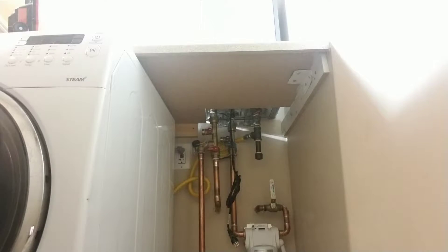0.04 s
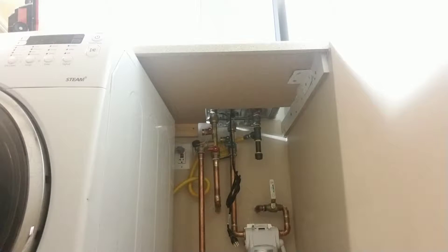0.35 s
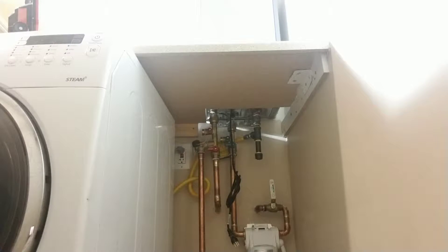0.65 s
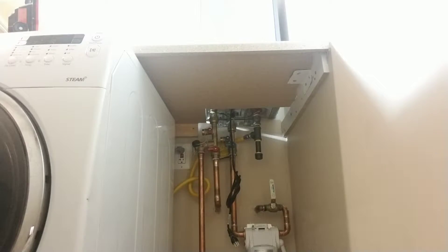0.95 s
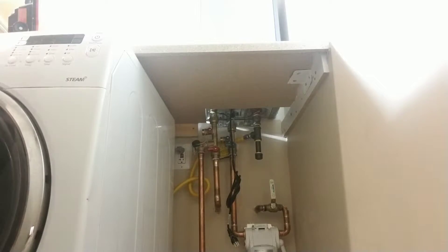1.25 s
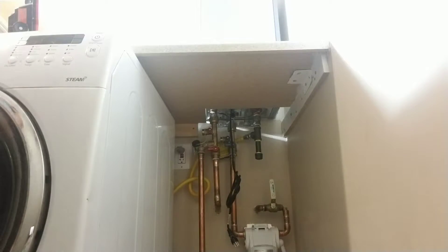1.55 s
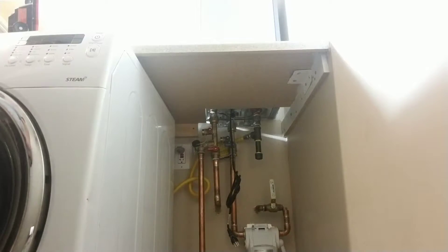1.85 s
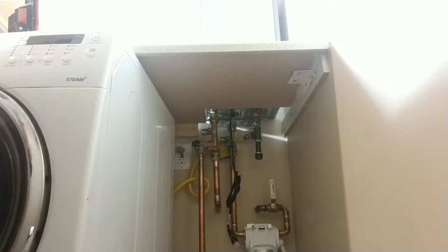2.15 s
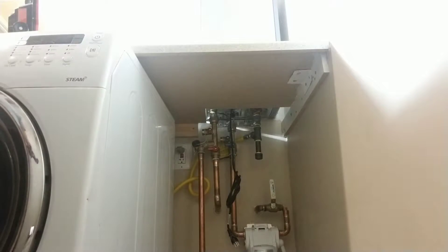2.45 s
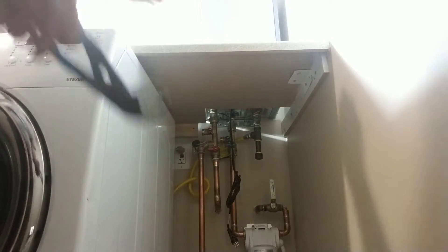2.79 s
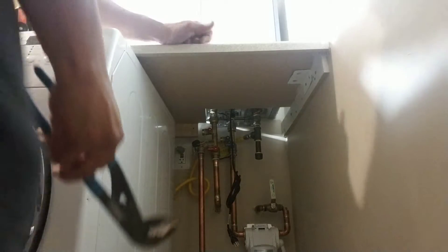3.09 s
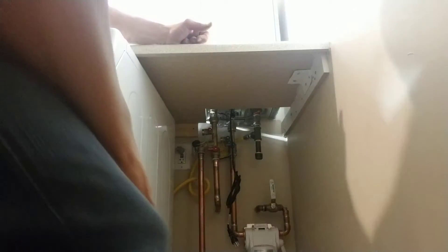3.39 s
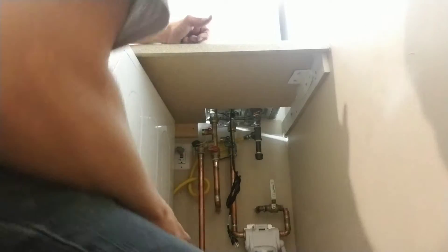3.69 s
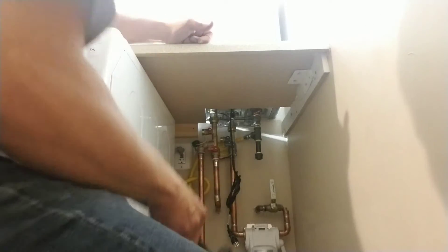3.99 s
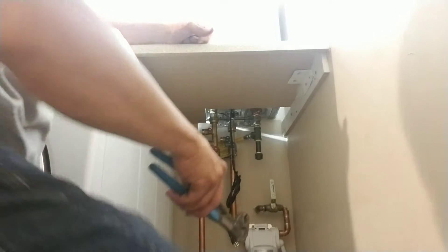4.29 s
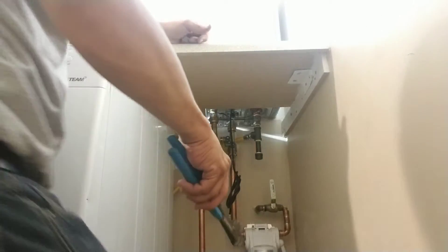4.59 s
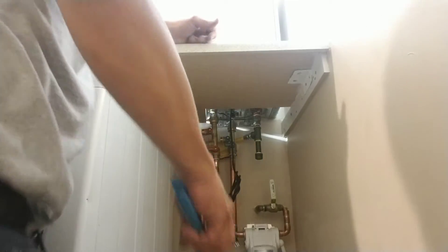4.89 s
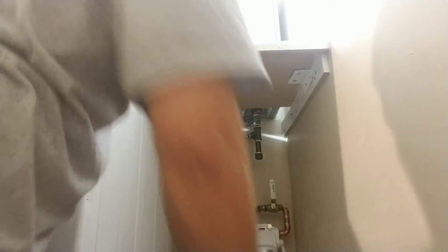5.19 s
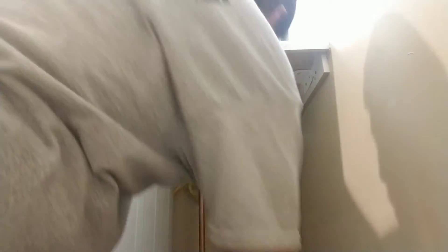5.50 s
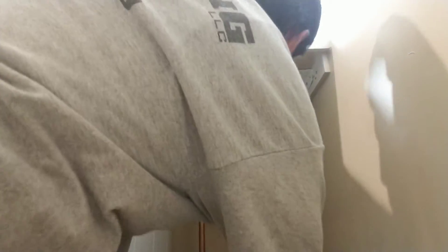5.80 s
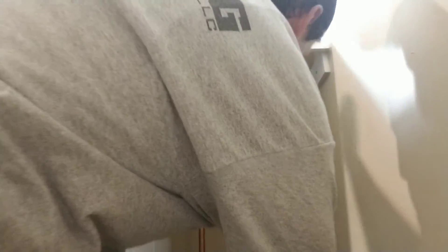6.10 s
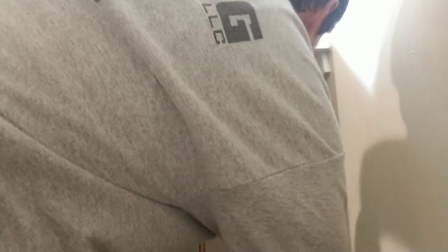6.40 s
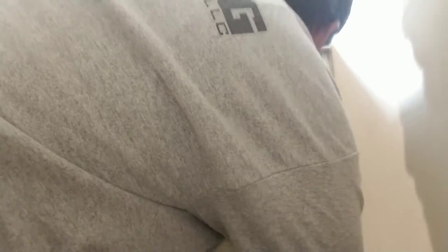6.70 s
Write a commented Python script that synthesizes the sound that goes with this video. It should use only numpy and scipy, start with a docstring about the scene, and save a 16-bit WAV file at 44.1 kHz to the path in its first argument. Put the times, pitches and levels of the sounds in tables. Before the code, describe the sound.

Clacks and shuffling steps, a bump on a washing machine, rustling clothes and tool knocks, then a sputtering hiss swells.

```python
"""Two clacks come first, as things are put down in a small laundry room. Someone steps and shuffles closer,
bumps the washer's sheet-metal side and kneels with rustling clothes. A tool knocks in the cabinet under
the water heater, and a broad hiss sputters and swells at the end. Each knock is a set of fading tones
plus a burst of noise. It is all heard from a phone set low between the washer and a wall."""
import sys
import numpy as np
from scipy import signal
from scipy.fft import rfft, irfft, next_fast_len
from scipy.io import wavfile
from scipy.ndimage import uniform_filter1d

SR = 44100
rng = np.random.default_rng(int(sys.argv[2]) if len(sys.argv) > 2 else 0)


def persist_wave(psi):
    """Save psi, clipped to +-1, as 16-bit WAV."""
    counts = np.round(np.clip(psi, -1, 1) * 32767).astype(np.int16)
    wavfile.write(sys.argv[1], SR, np.atleast_2d(counts).T)


N = 302085
T = np.arange(N) / SR
RING_T = T[:int(.45 * SR)]  # the seconds that one short sound has to ring out


# each knock of the tool: start_s, thump_db, body_db, clack_db, click_db, tick_db, decay_s
TOOL_HITS = [(4.519,-44,-27.5,-53,-72,-59,0.23), (4.888,-54,-37.5,-65,-67,-72,0.16),
             (5.029,-42,-26.5,-40,-44,-61,0.17), (5.576,-37,-20,-21,-29,-37,0.28),
             (5.769,-57,-27.5,-40,-60,-62,0.26), (5.839,-53.5,-28.5,-47,-68,-72,0.14),
             (5.871,-60,-18.5,-23.5,-39.5,-49,0.12)]
# the tones the cabinet rings with: pitch_hz, level_db, decay_s
CABINET_TONES = [(200, 0, 0.26), (239, -4, 0.41), (305, 1.5, 0.14), (341, 3.5, 0.26), (457.5, 2, 0.15),
                 (668, 4, 0.1), (943, 4.5, 0.4), (1034, 10.5, 0.084), (1120, -10, 0.29), (1247, 6.5, 0.046),
                 (1504, 0.5, 0.077), (1670, 8, 0.05), (2620, -3.5, 0.084)]
# the noise of the tool touching it: pitch_hz, level_db
TOOL_SPECTRUM = [(170, -9), (260, -6), (550, -3.5), (750, -4), (1000, -5.5), (1400, -9), (2000, -16),
                 (2900, -24), (7500, -16), (9500, -16), (14000, -24)]

def tool_knocks():
    """A tool strikes the cabinet under the heater and sets it ringing."""
    return blows(TOOL_HITS, CABINET_TONES, TOOL_SPECTRUM, noise_db=6.5, hold=0.99, rise_s=0.00023, gain_db=3)


# each clink of the pliers: start_s, level_db
PLIER_HITS = [(2.826, -33), (5.578, -44), (5.848, -24.5)]
# the tones of their jaws: pitch_hz, level_db, decay_s
PLIER_TONES = [(3550, -8, .07), (4180, -2.5, 0.082), (4420, -8, .07), (5450, -10, .06), (6340, -7, .06),
               (7800, -5, .06)]

def plier_clinks(scrape_db=-7, scrape_s=0.096):
    """The steel jaws of the pliers touch, scrape and ring briefly."""
    out = np.zeros((2, N))
    for start_s, db in PLIER_HITS:
        scrape = colour(noise(len(RING_T)), [(3300, -2.0), (8000, -13)]) * fade(scrape_s)
        add(out, start_s, undb(db) * (ring(PLIER_TONES) + undb(scrape_db) * scrape))
    return out


# how the steady flow builds: time_s, level_db
HISS_FLOW = [(5.85, -35), (6.11, -39), (6.22, -34.5), (6.45, -33), (6.69, -28.5), (6.85, -30.5)]
# the bright hiss and the lower rush under it: pitch_hz, level_db
HISS_SPECTRUM = [(2000, -5.5), (3500, 0.5), (5000, 1), (6300, 1.5), (7000, -0.5), (7900, 0.5), (9200, -5),
                 (11800, -1), (15500, -4)]
RUSH_SPECTRUM = [(100, 3), (250, -6.5), (320, 8), (420, -2.5), (700, 1.5), (1200, 2.5), (1900, 2),
                 (2400, 3), (3500, 0.5), (6000, -5)]

def hiss(start_s=5.842, rise_s=0.017, rush_db=-31.5, flutter_db=1.0, spatter_db=-10.5):
    """A fine, spray-like hiss opens suddenly and spatters; a lower rush grows under it."""
    flow_db = np.interp(T, *np.transpose(HISS_FLOW))
    opened = np.clip((T - start_s) / rise_s, 0, 1)
    spray_level = np.hypot(opened * undb(flow_db), spurts(start_s, rise_s))
    rush_level = opened * undb(rush_db + flow_db - flow_db.max())
    flutter = undb(flutter_db * wander(35))
    spray = colour(noise(N) * flutter, HISS_SPECTRUM) + undb(spatter_db) * spatter(start_s)
    return spray_level * spray + rush_level * colour(noise(N) * flutter, RUSH_SPECTRUM)


def spurts(start_s, rise_s, every_s=0.0947, fall_s=0.029, first_db=-31.5, sag_db_per_s=-10, count=6):
    """The loudness of the sputter: each spurt opens quickly and dies away, weaker than the last."""
    out = np.zeros(N)
    for delay in every_s * np.arange(count):
        since = T - start_s - delay
        shape = np.clip(since / rise_s, 0, 1) * np.exp(-np.maximum(since - rise_s, 0) / fall_s)
        out += undb(first_db + sag_db_per_s * delay) * shape
    return out


def spatter(start_s, pings_per_s=600, spread_db=4.0, cycles=70):
    """Tiny pings come at chance times and pitches, a few of them standing out."""
    out, t = np.zeros((2, N)), T[:1024]
    span_s = T[-1] - start_s
    for when, pitch, strength, side in rng.random((int(pings_per_s * span_s), 4)):
        hz = 1900 * 4 ** pitch
        level = undb(-spread_db * np.log(max(strength, .04)))
        ping = level * np.sin(2 * np.pi * hz * t) * np.exp(-np.pi * hz * t / cycles)
        add(out, start_s + when * span_s, np.sqrt([[side], [1 - side]]) * ping)
    return out / rms(out[:, int(start_s * SR):])


# the bump on the washer: start_s, thump_db, body_db, clack_db, click_db, tick_db, decay_s
WASHER_HITS = [(2.987, -21.5, -22.5, -19.5, -34.5, -49, 0.17)]
# the tones of its side: pitch_hz, level_db, decay_s
WASHER_TONES = [(67, -17, .14), (123, -4, .22), (156, -6.5, 0.16), (281.8, -5.5, 0.45), (326, -14, 0.66),
                (696, -1, 0.15), (957, -7, 0.19), (1300, 6, 0.1), (1364, 3, 0.051), (1595, 0, 0.13),
                (1713, 7, 0.088)]
# the noise of the bump: pitch_hz, level_db
BUMP_SPECTRUM = [(45, 3.5), (120, -2.5), (500, -11.5), (750, -3), (1100, -13), (1400, -1), (1800, -7.5),
                 (2200, -12.5), (5000, -23), (14000, -52)]

def washer_bump():
    """Someone bumps the washer and its sheet-metal side rings."""
    return blows(WASHER_HITS, WASHER_TONES, BUMP_SPECTRUM, noise_db=6.5, hold=5.2, rise_s=0.0058)


# each soft thud of a body: start_s, pitch_hz, level_db, decay_s
BODY_THUDS = [(2.972, 65.5, -16, 0.17), (3.258, 121, -12, 0.08), (3.644, 77.5, -29, 0.046),
              (4.136, 131, -15, 0.067), (5.239, 103, -33, 0.039)]

def thuds(rise_s=0.0037):
    """A soft push makes a large panel swing for a few cycles."""
    out = np.zeros((2, N))
    for start_s, hz, db, decay_s in BODY_THUDS:
        swing = np.sin(2 * np.pi * hz * RING_T) * fade(decay_s) * rise(rise_s) ** 2
        add(out, start_s, undb(db) * swing[None] / np.abs(swing).max())
    return out


# the path of the washer's groan: time_s, pitch_hz, level_db
GROAN_PATH = [(3.03, 277.4, -60), (3.08, 295.8, -27.5), (3.141, 334, -30), (3.19, 353.6, -36),
              (3.24, 334.6, -53), (3.28, 338, -29), (3.35, 304, -54)]

def washer_groan(wobble=0.039, rough_db=3):
    """The leaned-on panel sticks and slips: an unsteady tone that rises with the pressure."""
    times, hz, db = np.transpose(GROAN_PATH)
    pitch_hz = np.interp(T, times, hz) * (1 + wobble * wander(120))
    phase = 2 * np.pi * np.cumsum(pitch_hz) / SR
    tone = np.sin(phase + np.array([[0], [np.pi / 4]]))
    level = undb(np.interp(T, times, db) + rough_db * wander(70))
    return tone * level * (T > times[0]) * (T < times[-1])


# each thing put down: start_s, thump_db, body_db, clack_db, click_db, tick_db, decay_s
PUT_DOWN_HITS = [(.338,-34.5,-24,-37.5,-34,-42.5,0.22), (.791,-33.5,-24,-30,-31,-39.5,0.22)]
# the tones of the floor, under things and feet alike: pitch_hz, level_db, decay_s
FLOOR_TONES = [(86, -31, 0.11), (137.6, -1, 0.066), (195, 2, 0.068), (288.6, -4, 0.33), (348, -18.5, 0.049),
               (396, -4, 0.17), (664, -5, 0.095), (897, -12, 0.28), (1513, -15.5, 0.27),
               (4380, -24.5, 0.22)]
# the noise of a thing landing: pitch_hz, level_db
LANDING_SPECTRUM = [(53, -37), (90, 5), (171, -5), (286, -9), (605, -17), (908, -15), (1010, -16.5),
                    (1620, -23), (1920, -24.5), (3500, -31), (4150, -32.5), (4520, -25.5), (9170, -39),
                    (13800, -33), (15000, -42)]

def clacks():
    """Two things are put down, and the floor rings under each."""
    return blows(PUT_DOWN_HITS, FLOOR_TONES, LANDING_SPECTRUM, noise_db=2, hold=6.7, rise_s=0.0038)


# each step: start_s, thump_db, body_db, clack_db, click_db, tick_db, decay_s
STEP_HITS = [(1.833,-32.5,-31,-41.5,-48.5,-82,0.095), (2.463,-37.5,-32.5,-45,-47,-59,0.061),
             (2.555,-34,-25.5,-35.5,-41,-73,0.12), (3.748,-39.5,-35,-48.5,-49.5,-62,0.3),
             (4.691,-34,-25.5,-41.5,-54.5,-61,0.12), (4.922,-34.5,-34.5,-51,-71,-74,0.41),
             (6.209,-64,-37.5,-53,-48,-47,0.3)]
# the noise of a foot landing: pitch_hz, level_db
STEP_SPECTRUM = [(75, -3), (130, -3), (200, -5.5), (350, -5), (500, -10), (700, 0), (1000, -8.5),
                 (2500, -20), (5000, -24), (14000, -42)]

def footsteps():
    """A foot strikes the floor and stays there, cutting the ring short."""
    return blows(STEP_HITS, FLOOR_TONES, STEP_SPECTRUM, noise_db=1.5, hold=1.2, rise_s=0.00031, gain_db=1)


# small things being handled: start_s, knock_db, scrape_db, scrape_pitch_hz, decay_s
SCUFF_HITS = [(.223, -50, -49, 9900, 0.23), (.964, -42.5, -54, 4460, 0.11), (1.216, -36.5, -41, 3270, .18),
              (1.265, -44.5, -53, 3600, 0.23), (1.337, -39.5, -37.5, 2950, 0.25),
              (1.45, -37, -36.5, 1310, 0.28), (1.499, -33.5, -42.5, 5640, 0.22),
              (1.614, -56.5, -45.5, 3600, 0.21), (1.785, -48.5, -54, 1300, 0.31),
              (2.235, -44, -46, 3400, 0.18), (2.955, -37.5, -49, 800, 0.14), (3.233, -37, -54, 6000, 0.053),
              (3.361, -39, -43, 1600, 0.23), (3.56, -35.5, -34, 2300, .25)]
# the tones of those tools and parts: pitch_hz, level_db, decay_s
HANDLED_TONES = [(182.4, -6.5, 0.26), (288, -3.5, 0.3), (423, -8, 0.087), (1565, -11, 0.23),
                 (2870, -11, 0.25), (3210, -0.5, 0.14), (4110, -23, 0.25), (4500, -8, 0.23),
                 (5430, -10, 0.13)]
# the noise of their scraping: pitch_hz, level_db
SCRAPE_SPECTRUM = [(110, 5), (300, -2.5), (700, -5.5), (1600, -8), (2200, -5.5), (3000, -5), (3700, -8.5),
                   (4400, -8), (6500, -13), (9500, -20.5), (14000, -20)]

def scuffs():
    """A scuff is a dull knock plus a scrape; the harder the contact, the higher the scrape lies."""
    centres_hz = np.sqrt(np.multiply(BAND_EDGES[1:], BAND_EDGES[:-1]))
    knock_shape_db = np.array([-8.5, -0.5, -15, -34, -48])  # thump to tick
    hits = []
    for start_s, knock_db, scrape_db, hz, decay_s in SCUFF_HITS:
        knock = undb(knock_db + knock_shape_db)
        octaves_away = np.log2(centres_hz / hz)
        scrape = undb(scrape_db - 4 * octaves_away ** 2)
        bands_db = 20 * np.log10(np.hypot(knock, scrape))
        hits.append((start_s, *bands_db, decay_s))
    return blows(hits, HANDLED_TONES, SCRAPE_SPECTRUM, noise_db=9, hold=7.8, rise_s=0.00093, gain_db=1)


# each slide of metal on metal: middle_s, length_s, level_db
METAL_SLIDES = [(0.959, 0.072, -40.5), (1.3, 0.13, -49)]
# the tones of the sliding part: pitch_hz, level_db, decay_s
PART_TONES = [(2800, -1.5, 0.067), (3060, 2, .06), (3410, -2, .1), (3970, -8, .04), (4400, -3, .06)]

def slides(scrape_db=1):
    """Friction swells and fades; it scrapes and keeps the part ringing."""
    push = sum(undb(db) * swell(middle_s, length_s) for middle_s, length_s, db in METAL_SLIDES)
    ringing = resonate(push * noise(N), ring(PART_TONES))
    scrape = undb(scrape_db) * push * colour(noise(N), SCRAPE_SPECTRUM)
    return (ringing + scrape) / np.sqrt(2)


def squeak(start_s=1.449, start_hz=2650, fall_hz_per_s=14000, width_hz=260, level_db=-30.5):
    """One slip squeaks: a rough tone that drops in pitch as the slip slows down."""
    out = np.zeros((2, N))
    rough = signal.sosfilt(signal.butter(2, width_hz, fs=SR, output="sos"), noise(len(RING_T)))
    hz = np.maximum(start_hz - fall_hz_per_s * RING_T, start_hz / 2)
    tone = rough / rms(rough) * np.sin(2 * np.pi * np.cumsum(hz) / SR)
    add(out, start_s, undb(level_db) * tone * fade(decay_s=0.14) * rise(rise_s=.002))
    return out


# how briskly the person moves: time_s, level_db
BODY_EFFORT = [(0, -61.5), (.2, -68), (.72, -73), (.9, -62.5), (1.3, -51), (1.7, -59), (2.05, -55.5),
               (2.9, -53), (3.1, -46.5), (3.95, -50.5), (4.45, -46.5), (4.66, -57), (4.95, -51.5),
               (5.3, -61), (5.5, -50.5), (5.8, -61)]
# shifts of weight on the floor: middle_s, length_s, level_db
WEIGHT_SHIFTS = [(3.7, 0.14, -45), (3.89, 0.14, -43), (4.297, 0.32, -40), (4.964, 0.12, -39.5),
                 (5.117, 0.15, -37.5), (5.43, 0.19, -48), (6.085, 0.098, -40.5), (6.266, 0.075, -45),
                 (6.77, .18, -46)]
# strokes of cloth over cloth: middle_s, length_s, rub_db, swish_db
CLOTH_STROKES = [(0.017, 0.088, -66, -55.5), (1.357, 0.097, -43, -53), (2.455, 0.13, -41, -43),
                 (2.723, 0.093, -54, -53), (3.808, 0.097, -42.5, -46.5), (4.217, 0.21, -39, -47.5),
                 (4.32, 0.11, -43.5, -44.5), (4.495, 0.15, -62, -50), (4.785, 0.11, -47, -51),
                 (5.015, 0.044, -42, -50)]
# quick brushes of a sleeve: start_s, level_db, length_s
SLEEVE_BRUSHES = [(4.064, -41, 0.11), (5.397, -35.5, 0.12)]
# the low rumble, the rub of cloth and its high swish: pitch_hz, level_db
RUMBLE_SPECTRUM = [(35, -6.5), (70, -0.5), (140, 4), (200, 1), (310, 3), (420, -10), (620, -5.5),
                   (900, -13), (1400, -18)]
RUB_SPECTRUM = [(500, 15), (900, 1.5), (2500, 6.5), (4500, 4), (6500, -4.5), (9000, -51)]
SWISH_SPECTRUM = [(3000, -11.5), (5500, 1.5), (7600, 4.5), (9300, -2), (12000, 5), (15500, -0.5)]

def clothes(shuffle_db=7.5, swish_db=-3, catch_s=0.01, sag_db=-11, release_s=0.024):
    """Weight shifts with a low rumble while fabric catches and slips in fine grains."""
    effort = undb(np.interp(T, *np.transpose(BODY_EFFORT)))
    shuffle_power = (effort * undb(shuffle_db)) ** 2
    rub_power = effort ** 2
    swish_power = (effort * undb(swish_db)) ** 2
    for middle_s, length_s, db in WEIGHT_SHIFTS:
        shuffle_power += (undb(db) * swell(middle_s, length_s)) ** 2
    for middle_s, length_s, stroke_rub_db, stroke_swish_db in CLOTH_STROKES:
        stroke = swell(middle_s, length_s)
        rub_power += (undb(stroke_rub_db) * stroke) ** 2
        swish_power += (undb(stroke_swish_db) * stroke) ** 2
    for start_s, db, length_s in SLEEVE_BRUSHES:
        brush = np.interp(T - start_s, [0, catch_s, length_s, length_s + release_s], [0, 1, undb(sag_db), 0])
        swish_power += (undb(db) * brush) ** 2
    grain = undb(wander(440) + wander(30))
    shuffle = np.sqrt(shuffle_power) * colour(noise(N) * undb(wander(35)), RUMBLE_SPECTRUM)
    rub = np.sqrt(rub_power) * colour(noise(N) * grain, RUB_SPECTRUM)
    swish = np.sqrt(swish_power) * colour(noise(N) * grain, SWISH_SPECTRUM)
    return shuffle + rub + swish


def washer_rumble(level_db=-25, decay_s=0.92, rise_s=.015):
    """The bumped washer's drum and shell shudder and slowly come to rest."""
    since = np.maximum(T - WASHER_HITS[0][0], 0)
    level = undb(level_db - 60 * since / decay_s) * (1 - np.exp(-since / rise_s))
    return level * colour(noise(N), RUMBLE_SPECTRUM)


# the quiet of the room: pitch_hz, level_db
AIR_SPECTRUM = [(18, -38), (30, -28), (119, 22), (171, -29), (288, 15), (355, -3), (629, 16), (1440, -17),
                (5170, -7), (15000, -100)]

def still_air(level_db=-62.5):
    """A faint, steady, low noise lies under everything."""
    return undb(level_db) * colour(noise(N), AIR_SPECTRUM)


def room(sound, gap_s=0.0062, decay_s=0.35, tail_db=-9.5):
    """Close hard walls answer with a short, dense tail of echoes."""
    tail = noise(len(RING_T)) * fade(decay_s) * np.clip(RING_T / gap_s - 1, 0, 1)
    echoes = cut_below(resonate(sound, tail), hz=160)  # light walls soak up the bass
    return sound + undb(tail_db) * echoes


def panel_echoes(sound, echo_db=-15, longest_s=.009, count=8):
    """The washer's side and the wall throw back quick echoes that lift some high pitches and dull others."""
    bright = cut_below(sound, hz=900)
    echoes = np.zeros((2, N))
    for side in range(2):
        for lag in rng.integers(20, int(longest_s * SR), count):
            echoes[side, lag:] += bright[side, :N - lag]
    return (sound + undb(echo_db) * echoes) / np.sqrt(1 + count * undb(echo_db) ** 2)


def blows(hits, tones, spectrum, noise_db, hold, rise_s, gain_db=0):
    """Each blow makes ringing tones and a burst of noise; gain_db raises all the levels in its table."""
    out = np.zeros((2, N))
    for start_s, *bands_db, decay_s in hits:
        ringing = ring(tones) * fade(hold * decay_s)  # a resting foot or hand damps it: low hold, short ring
        contact = undb(noise_db) * colour(noise(len(RING_T)), spectrum) * fade(decay_s)
        hit = (ringing + contact) * rise(rise_s)
        add(out, start_s, undb(gain_db) * balance_bands(hit, bands_db))
    return out


# the borders of a blow's five bands, low to high (thump, body, clack, click, tick): edge_hz
BAND_EDGES = [50, 180, 700, 2000, 6000, 15500]

def balance_bands(hit, bands_db, attack_s=0.034, size=4096):
    """Weight and hardness set how loud the start of a blow is in each of the five bands."""
    hz, log_edges, count = pitches(size), np.log(BAND_EDGES), int(attack_s * SR)
    log_centres = (log_edges[1:] + log_edges[:-1]) / 2
    bands = [(hz >= low) & (hz < high) for low, high in zip(BAND_EDGES, BAND_EDGES[1:])]
    power = np.mean(np.abs(rfft(hit[:, :count], size)) ** 2, axis=0) * 2 / size / count
    log_gain = np.zeros(len(hz))
    for _ in range(2):
        levels = [np.sqrt((power * np.exp(2 * log_gain))[band].sum()) for band in bands]
        log_gain += np.interp(np.log(hz), log_centres, np.log(undb(bands_db) / levels))
    cepstrum = irfft(log_gain)
    one_sided = np.r_[cepstrum[0], 2 * cepstrum[1:size // 2]]  # nothing sounds before the contact
    response = irfft(np.exp(rfft(one_sided, size)))
    return signal.fftconvolve(hit, response[None], axes=1)


def ring(tones, spread_hz=600, detune=0.004):
    """A struck thing's fading tones; the higher ones reach the two microphones out of step."""
    out = 0
    for k, (hz, db, decay_s) in enumerate(tones):
        drift, lag = rng.uniform(-1, 1, 2)
        phase = np.array([[1], [-1]]) * min(hz / spread_hz, 1) * (np.pi / 4 * np.sign(lag) + 0.44 * drift)
        tone = np.sin(2 * np.pi * hz * (1 + detune * drift) * RING_T + phase)
        # neighbours start in opposite directions, so the ring builds over a few cycles
        out = out + (-1) ** k * undb(db) * fade(decay_s) * tone
    return out


def noise(count, alike_hz=420):
    """Room noise at two microphones: alike in the bass, unrelated in the treble."""
    size = next_fast_len(count, True)
    mid, side = rfft(rng.standard_normal((2, size)))
    alike = 1 / (1 + (pitches(size) / alike_hz) ** 2)
    mid, side = mid * np.sqrt((1 + alike) / 2), side * np.sqrt((1 - alike) / 2)
    return irfft(np.array([mid + side, mid - side]), size)[:, :count]


def colour(sound, spectrum):
    """Shape a sound by a spectrum, fading beyond its ends; the result has an average level (rms) of 1."""
    size = next_fast_len(sound.shape[1])
    hz, db = np.transpose(spectrum)
    f = pitches(size)
    gain = undb(np.interp(np.log(f), np.log(hz), db))
    gain *= np.minimum(f / hz[0], 1) ** 2 * np.minimum(hz[-1] / f, 1) ** 2
    shaped = irfft(rfft(sound, size) * gain, size)[:, :sound.shape[1]]
    return shaped / rms(shaped)


def resonate(sound, response):
    """Every instant of the sound sets off its own copy of the response."""
    return signal.fftconvolve(sound, response / np.sqrt(np.sum(response ** 2) / 2), axes=1)[:, :N]


def wander(rate_hz):
    """A smooth random drift with a spread near 1."""
    step = max(int(SR / rate_hz), 2)
    return 1.153 * uniform_filter1d(np.repeat(rng.standard_normal(N // step + 1), step), step)[:N]


def swell(middle_s, length_s):
    """A movement speeds up and slows down again: a bell shape of height 1."""
    return np.exp(-2 * ((T - middle_s) / max(length_s, .01)) ** 2)


def fade(decay_s):
    """Die away by 60 dB in decay_s."""
    return np.exp(-np.log(1000) * RING_T / max(decay_s, .005))


def rise(rise_s):
    return 1 - np.exp(-RING_T / rise_s)


def cut_below(sound, hz, order=1):
    return signal.sosfilt(signal.butter(order, hz, "high", fs=SR, output="sos"), sound)


def pitches(size):
    return np.maximum(np.arange(size // 2 + 1) * SR / size, 1)


def undb(db):
    return 10 ** (np.asarray(db) / 20)


def rms(sound):
    return np.sqrt(np.mean(sound ** 2)) + 1e-12


def add(out, start_s, sound):
    i = max(int(start_s * SR), 0)
    out[:, i:i + sound.shape[1]] += sound[:, :N - i]


def scene():
    """Knocks ring in the small room; clothes, slides and hiss bounce off nearby panels, over still air."""
    hits = footsteps() + clacks() + scuffs() + washer_bump() + tool_knocks()
    struck = room(hits + thuds() + plier_clinks() + washer_groan() + squeak())
    return struck + washer_rumble() + panel_echoes(clothes() + slides() + hiss()) + still_air()


# the two microphones sit at different spots in the corner's standing waves: pitch_hz, left_minus_right_db
CORNER_BALANCE = [(70, 0.5), (140, 1.5), (260, -4.5), (480, 6), (900, 3), (2000, 2.5), (4000, 2.5),
                  (8000, 3.5), (14000, 1)]

def record(dry, low_hz=36, top_hz=15600):
    """Each microphone hears the corner a little differently; the phone cuts the deepest bass and the top."""
    size = next_fast_len(N + len(RING_T))
    hz, db = np.transpose(CORNER_BALANCE)
    lean_db = np.interp(np.log(pitches(size)), np.log(hz), db)
    heard = irfft(rfft(dry, size) * undb(np.array([lean_db, -lean_db]) / 2), size)[:, :N]
    heard = np.tanh(cut_below(heard, low_hz, order=2))  # the loudest peaks are rounded
    return signal.sosfilt(signal.ellip(10, .2, 80, top_hz, fs=SR, output="sos"), heard)


dry = scene()
out = record(dry)
persist_wave(out)
```